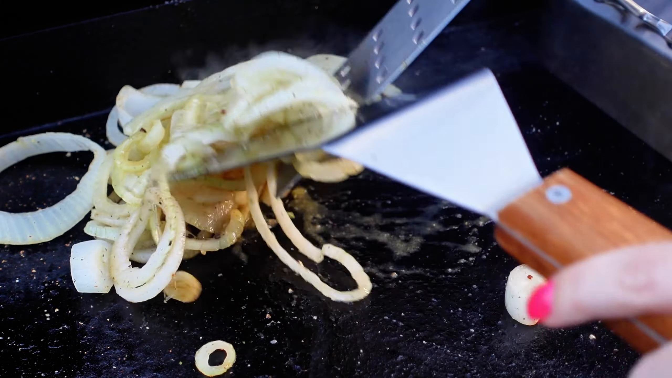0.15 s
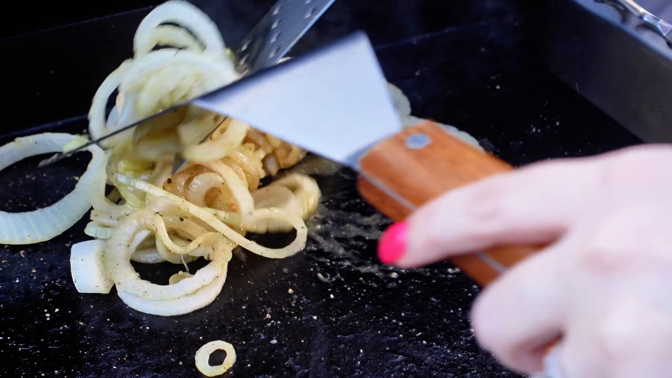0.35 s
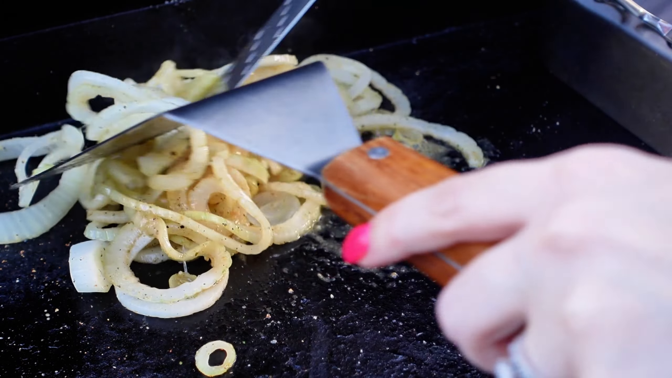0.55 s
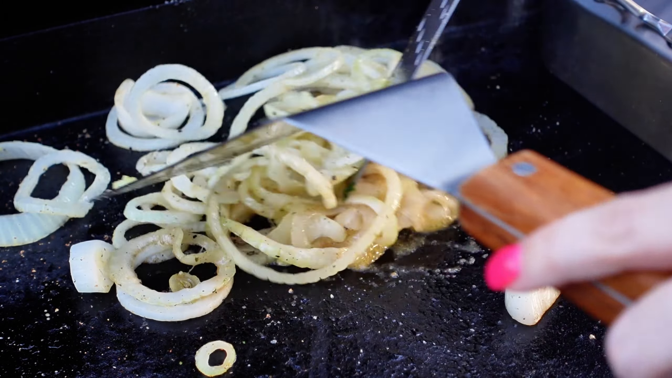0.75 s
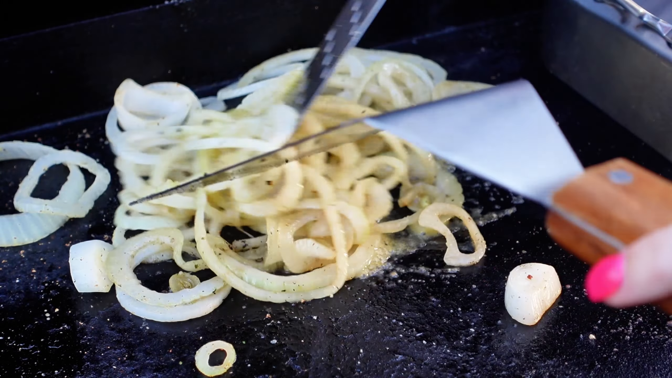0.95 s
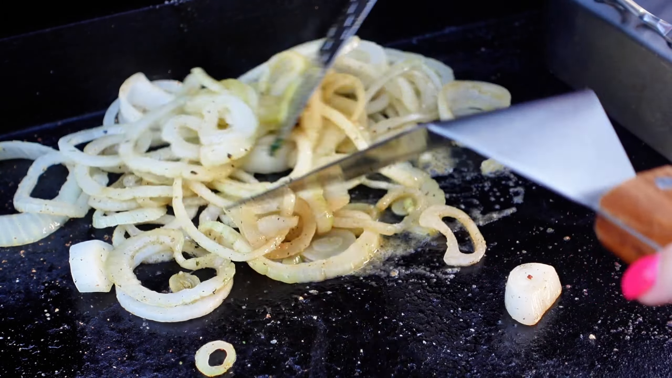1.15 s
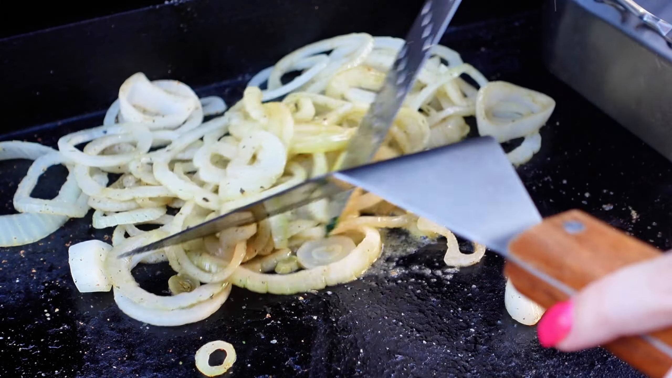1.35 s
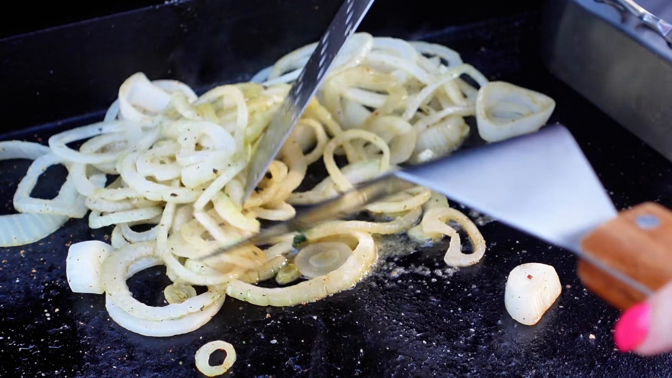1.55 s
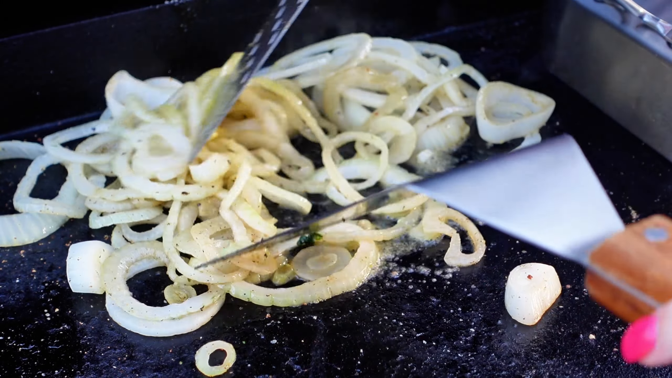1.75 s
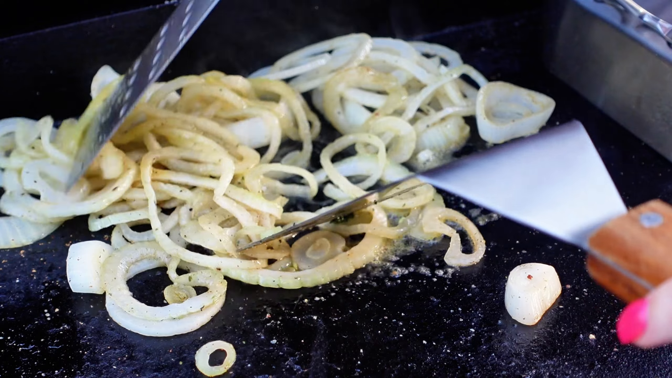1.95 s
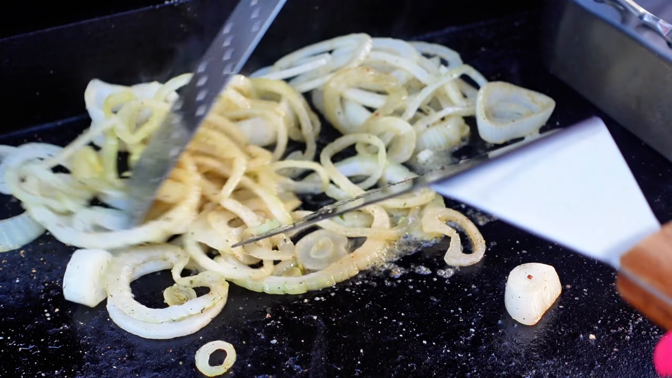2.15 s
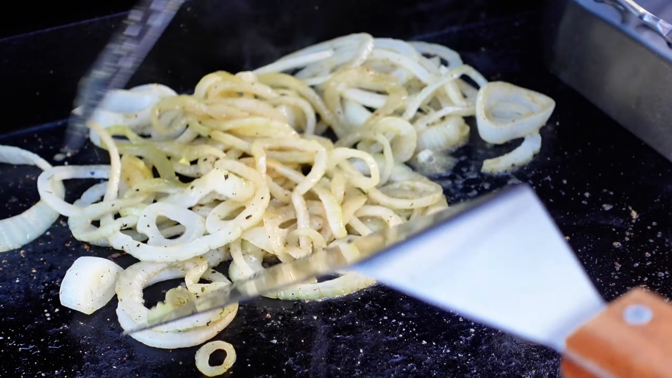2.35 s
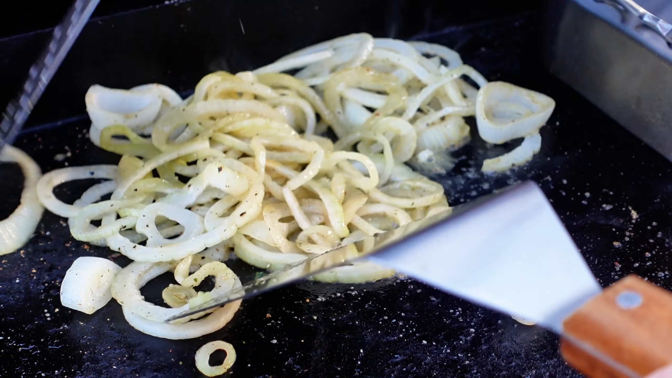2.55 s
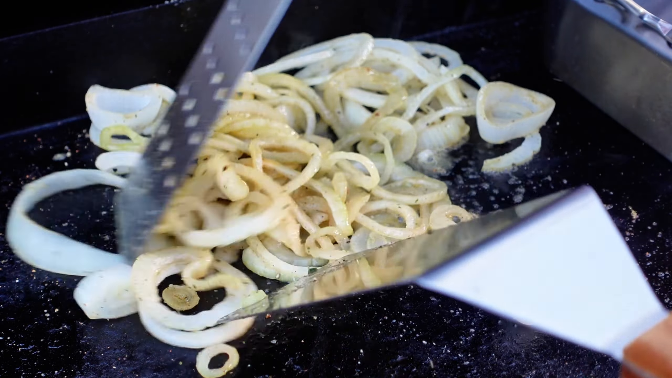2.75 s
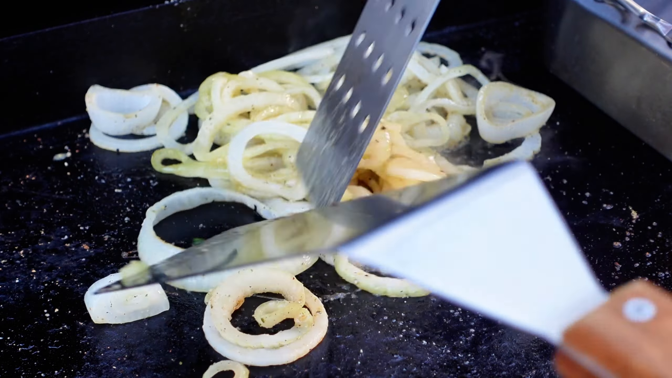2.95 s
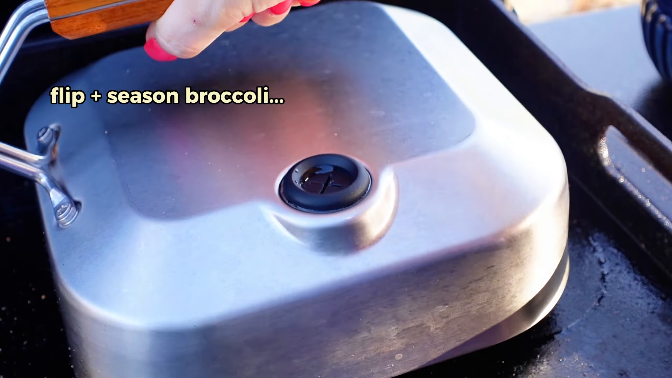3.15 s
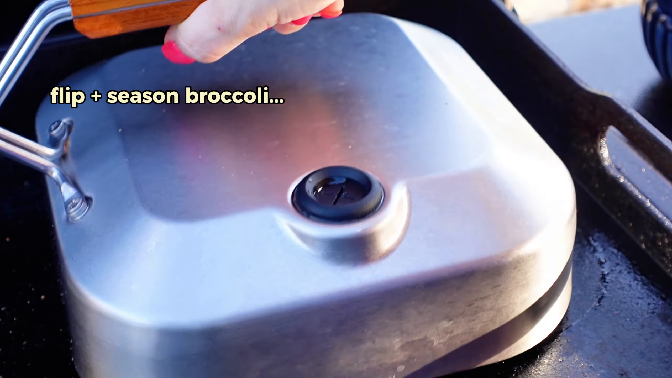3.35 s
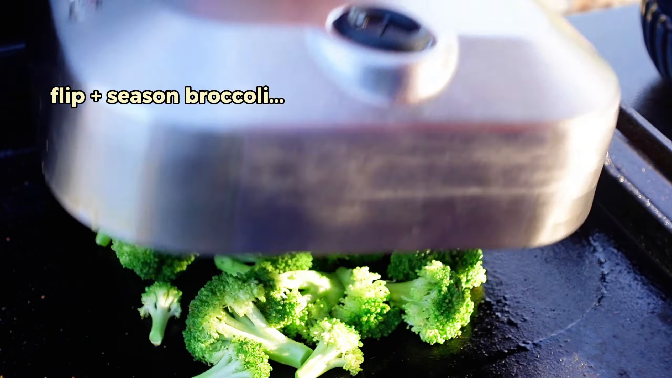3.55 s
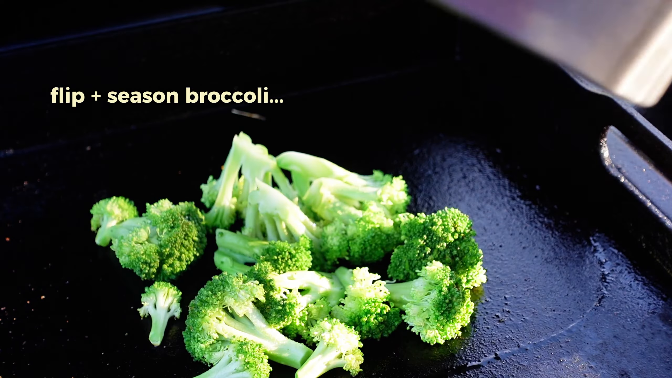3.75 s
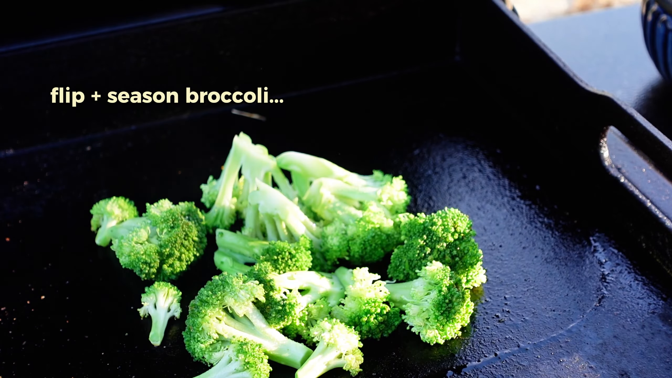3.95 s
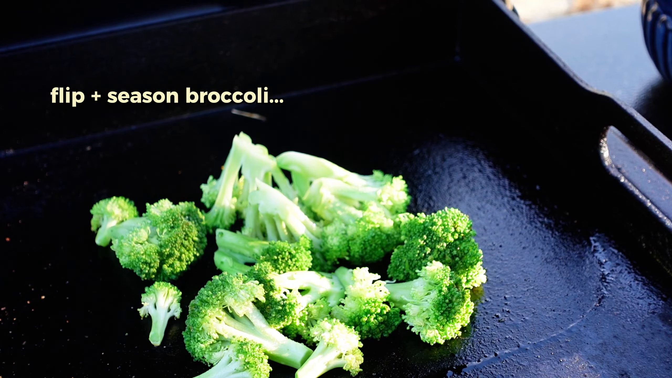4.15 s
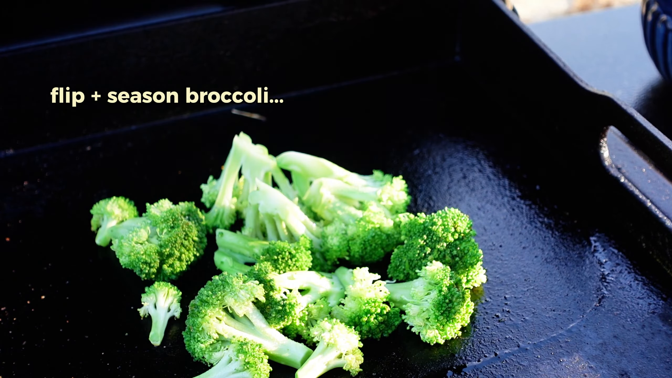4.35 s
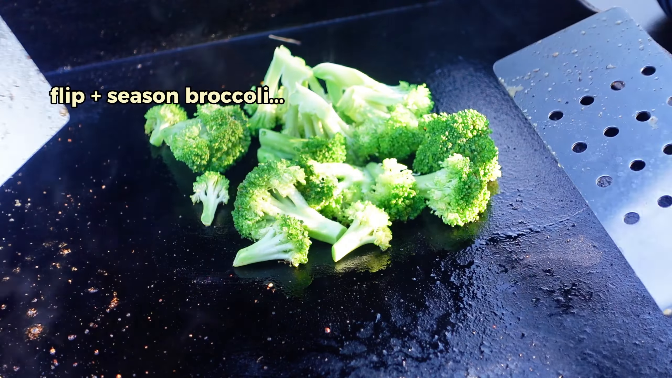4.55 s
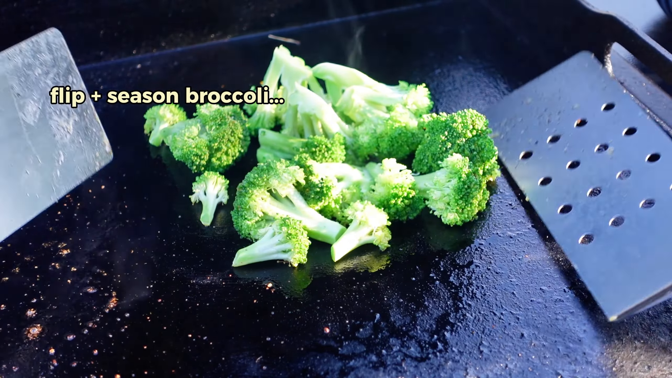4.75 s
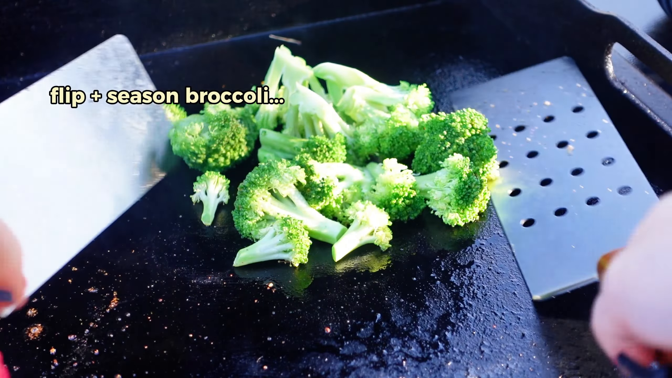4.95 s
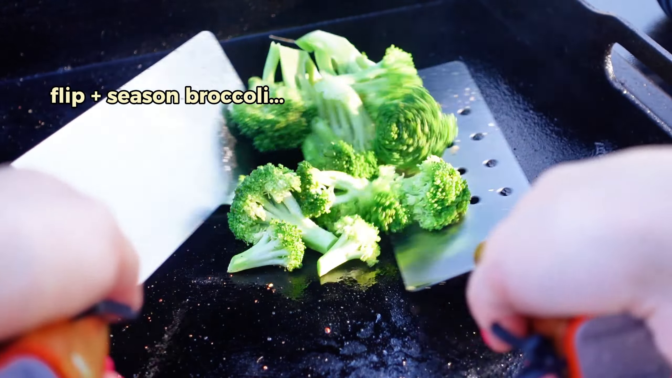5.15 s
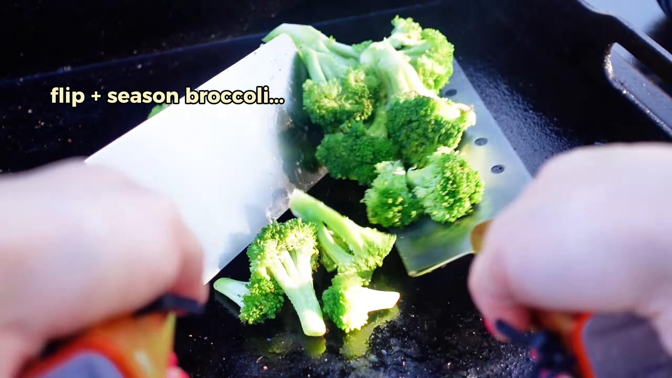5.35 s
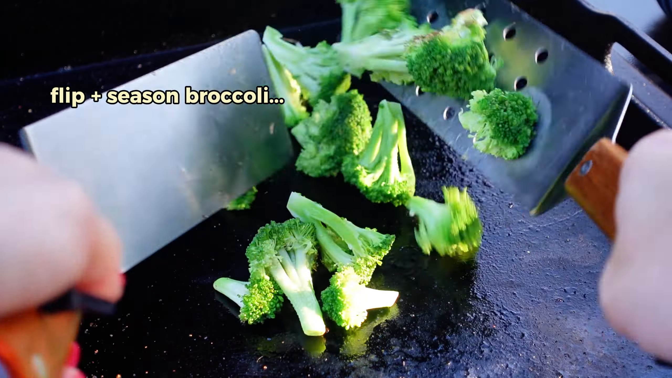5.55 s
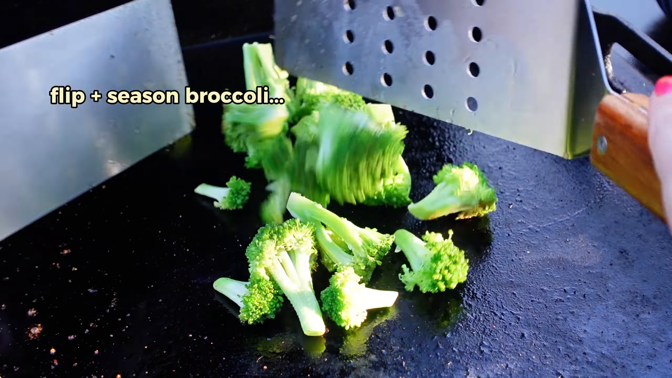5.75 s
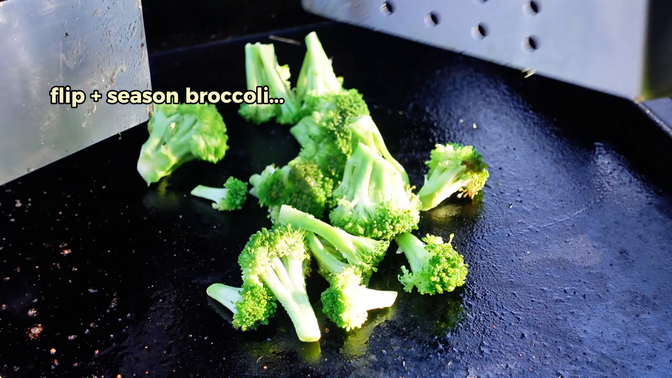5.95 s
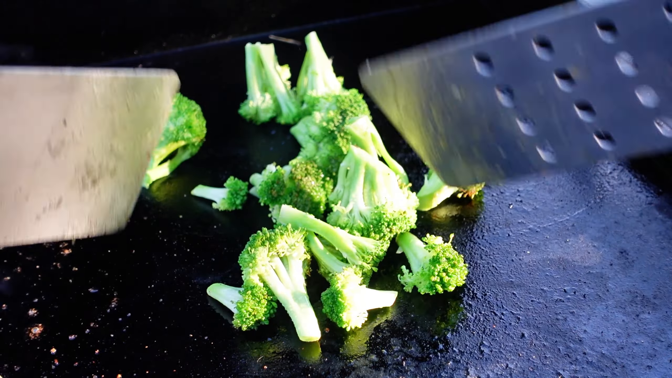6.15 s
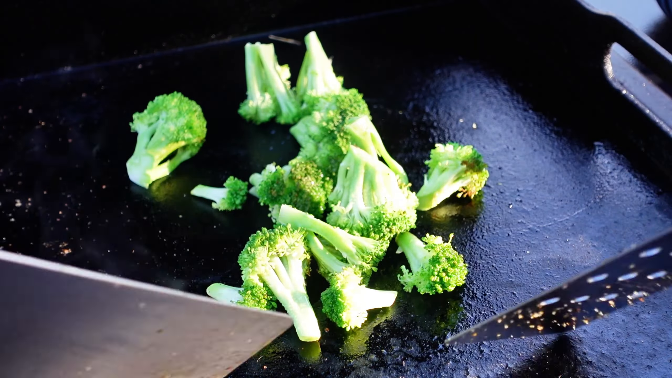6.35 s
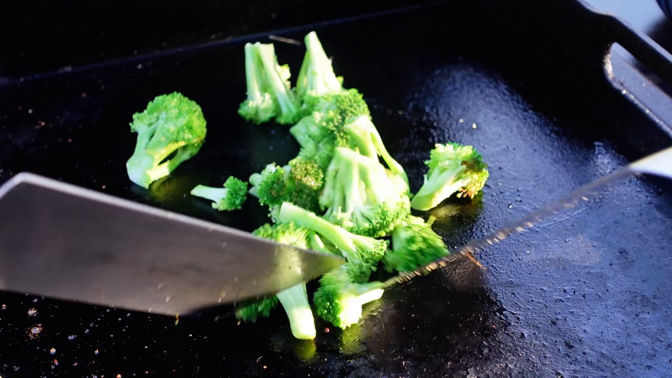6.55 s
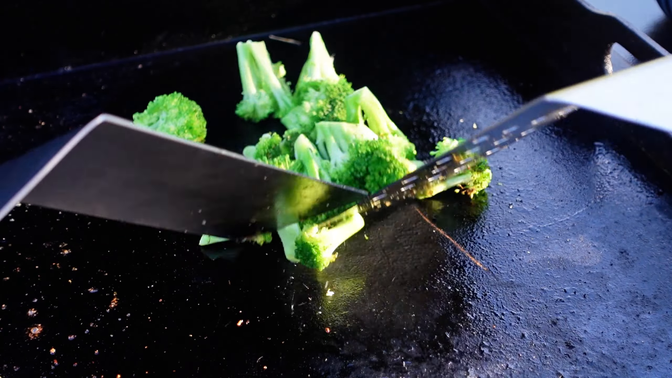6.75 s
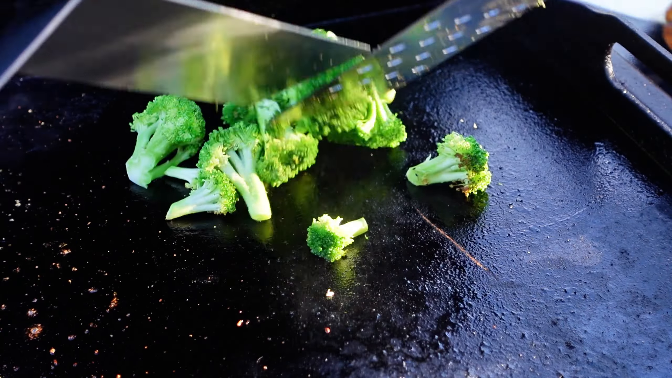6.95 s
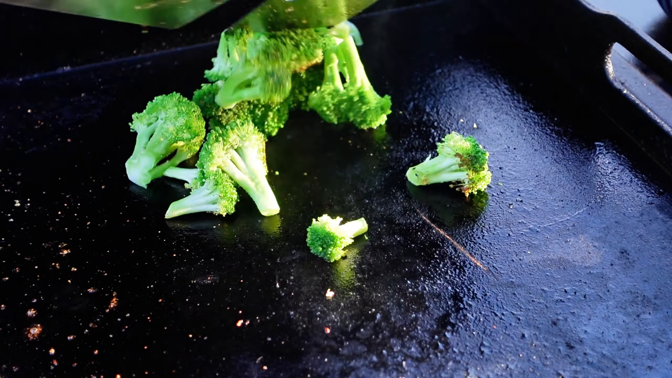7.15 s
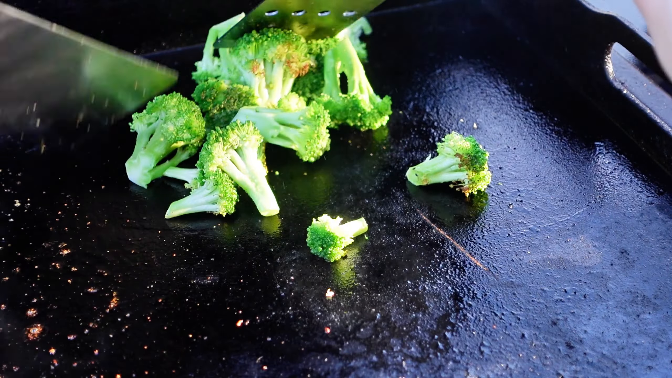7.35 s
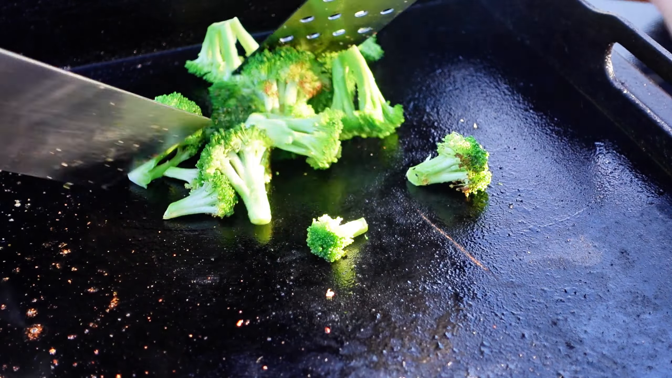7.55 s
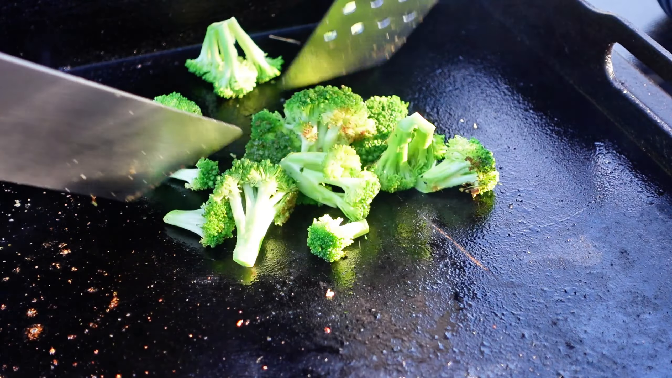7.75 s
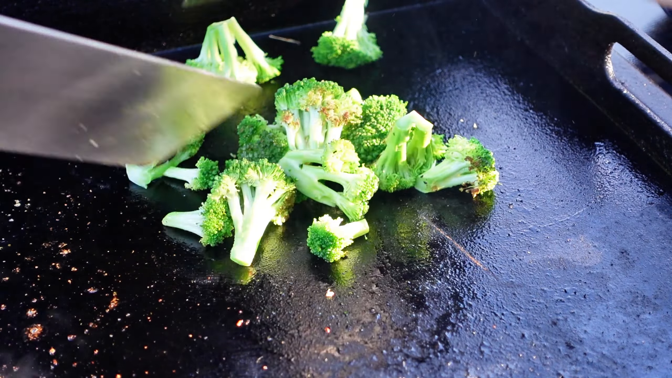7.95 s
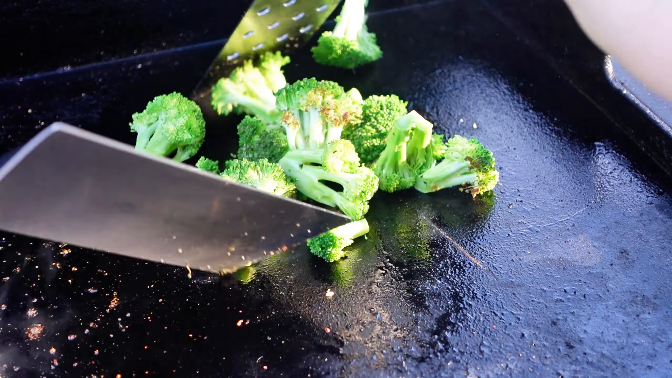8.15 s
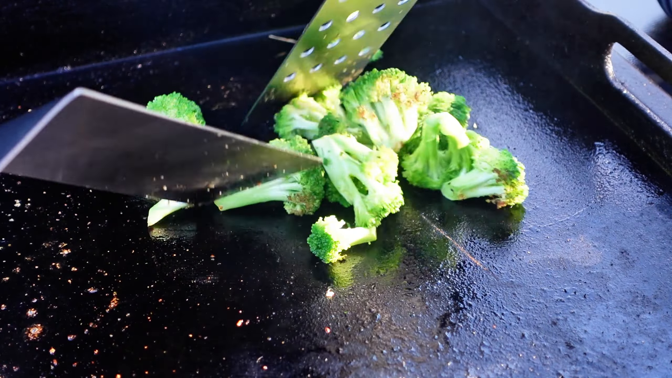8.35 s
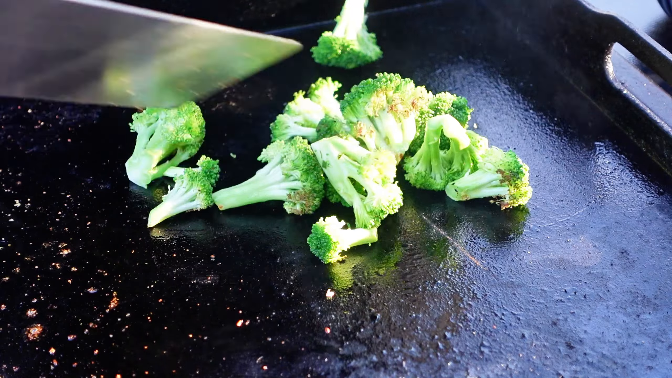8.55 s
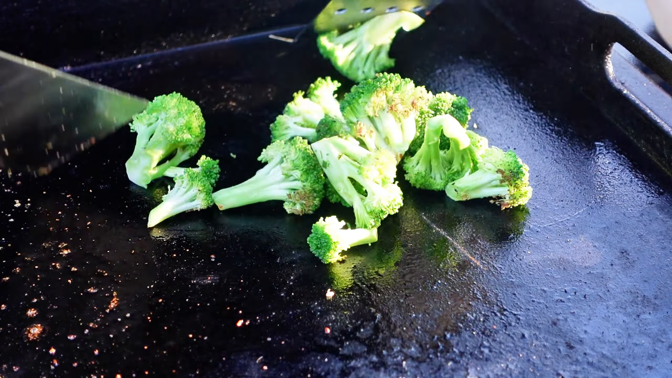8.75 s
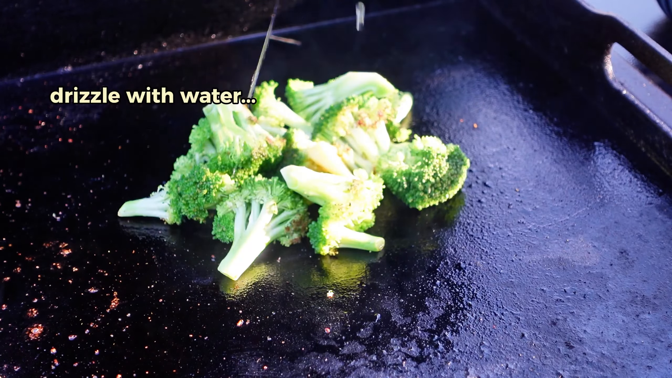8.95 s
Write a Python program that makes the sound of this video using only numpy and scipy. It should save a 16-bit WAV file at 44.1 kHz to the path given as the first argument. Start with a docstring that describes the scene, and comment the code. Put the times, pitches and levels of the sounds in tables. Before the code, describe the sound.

Very close outdoor pickup of frying on a steel griddle, nearly centred, with a faint low gas-flame rumble. From 0 to 3.2 s onions give a dense, bright hiss and fine crackle that surges as they are turned, strongest near 2.1 s. A soft landing opens it; a faint scrape follows at 0.5-0.85, with low muffled thuds. At 1.46-1.6 thin blades clash and ring, with a tiny steam squeak. A sharp clank at 2.6 leads into a scrape. At 3.16 a lid gives a dull, hollow double knock; broccoli then simmers more quietly, with crisp fat snaps. Spatulas clank at 4.8, scrape around 5-5.3 and touch brightly at 5.28. Sizzle flares again; stronger clanks and scrapes come at 6.4-6.75, 7.4-7.7 and 8.1-8.3, with loud pops near 6.5. Last knocks at 8.73-8.8 cut off abruptly, leaving bare, quieter frying until 9.0.

```python
"""Onions, then broccoli, fry on a gas-fired steel griddle outdoors, close to the microphone, in three shots.
Steam bubbles hiss and crackle, fat pops, flames rumble; a spatula lands and scrapes amid soft low thuds.
Near 1.5 s the blades clash and steam squeaks; near 3.2 s, as the broccoli begins, a lid is knocked as it lifts.
More blows and scrapes follow, with a last touch of blades near 5.3 s; the third shot is a moment of frying.
Filtered noise and random impacts make the frying; contact forces ring the modes of plate, blades and lid."""
import sys
import numpy as np
from scipy import signal
from scipy.io import wavfile
from scipy.ndimage import uniform_filter1d

SR = 44100
rng = np.random.default_rng(int(sys.argv[2]) if len(sys.argv) > 2 else 0)


def master(y):
    """Save y as 16-bit WAV."""
    cut = np.clip(np.atleast_2d(y).T, -1, 1)
    pcm = np.round(cut * 32767)  # scale
    wavfile.write(sys.argv[1], SR, pcm.astype(np.int16))


N = 397341

# Where the shots begin, and where the last one ends, in seconds.
SHOTS = [0, 3.155, 8.821, 9.02]
# The crowd of weak modes of plate and lid. Each row: frequency in Hz, level in dB per Hz.
CROWD = [(30, -31), (55, -12), (70, -23), (130, -8.5), (270, 1.5), (430, 0), (560, -10), (850, -11),
         (1100, -5), (1550, -0.5), (2600, 1.5), (5000, 6.5), (16000, -13)]


def amp(db):
    """Decibels to gain."""
    return 10 ** (np.asarray(db) / 20)


def rms(x):
    """Root mean square."""
    return np.sqrt(np.mean(x ** 2) + 1e-20)


def read(points, hz):
    """A spectrum joined by straight lines on a log-frequency axis."""
    f, value = np.transpose(points)
    return np.interp(np.log(hz + 1), np.log(f + 1), value)


def add(mix, s, sound):
    """Mixes a sound in at time s."""
    part = mix[max(round(s * SR), 0):][:len(sound)]
    part += sound[:len(part)]


def seconds(length):
    """A time axis."""
    return np.arange(int(length * SR)) / SR


def colour(x, db_of_hz, size=4096):
    """Causal (minimum-phase) filter whose gain in dB is a function of frequency."""
    hz = abs(np.fft.fftfreq(size, 1 / SR))
    log_gain = np.log(amp(np.maximum(db_of_hz(hz), -100)))
    # the Hilbert transform of the log gain gives the minimum phase
    taps = np.fft.ifft(np.exp(np.conj(signal.hilbert(log_gain)))).real[:size // 2]
    return signal.oaconvolve(x, taps)[:len(x)]


def shaped(x, points):
    """Gives x a spectrum and an rms of 1."""
    y = colour(x, lambda hz: read(points, hz))
    return y / rms(y)


def contacts(count, per_s):
    """Sparse tiny impacts of random size, with an rms near 1."""
    hits = rng.random(count) < per_s / SR
    return rng.standard_normal(count) * hits * np.sqrt(SR / per_s)


def surge(age, rise_s, fade_s):
    """Envelope: a straight rise to 1, then an exponential fade."""
    rise_s = max(rise_s, 1e-3)
    return np.clip(age / rise_s, 0, 1) * np.exp(-np.maximum(age - rise_s, 0) / fade_s)


def sizzle(pivot_hz=6500, flutter_db=0.8, merging=0.14):
    """Separate bubbles over a hiss of merged ones; each turn swells them, the finer ones later and longer."""
    # Colour of the sizzling onions. Each row: frequency in Hz, level in dB per Hz.
    onions = [(100, -46), (500, -13), (800, -8.5), (1000, -5), (1400, -5), (1850, -6), (2700, -1.5),
              (4000, -.5), (6500, 0), (9200, -5), (12500, -11), (16000, -21.5)]
    # Colour of the sizzling broccoli. Each row: frequency in Hz, level in dB per Hz.
    broccoli = [(100, -35), (500, -13), (800, -12), (1000, -12), (1400, -6), (2200, -6), (3400, -1),
                (5000, -2.5), (7000, -3.5), (9700, -7.5), (13000, -12), (16000, -20)]
    # Each row, one a shot: power share of separate bubbles before merging (0-1), spread of their sizes in dB.
    bubbling = [(0.46, 3.5), (0.68, 6), (0.7, 6)]
    # Steady frying of food left alone, one level in dB for each shot.
    simmer_levels = [-31, -34.5, -37]
    out = np.zeros(N)
    core = signal.butter(4, [4500, 9000], "band", fs=SR, output="sos")  # the band that sets the level
    shots = zip(SHOTS, SHOTS[1:], simmer_levels, [onions, broccoli, broccoli], bubbling)
    for start, end, simmer_db, food, (share, spread_db) in shots:
        level_db = boiling_db(start + seconds(end - start), 0, simmer_db, start, end)
        count = len(level_db)
        # where wet food meets fresh hot steel, the bubbles crowd together into hiss
        excess_db = np.maximum(level_db - np.median(level_db), 0)
        share = np.clip(share * amp(-merging * excess_db), 0, 1)
        crackle = np.sqrt(share) * bubbles(count, spread_db)
        hiss = np.sqrt(1 - share) * rng.standard_normal(count)
        steam = shaped(crackle + hiss, food)
        steam /= rms(signal.sosfilt(core, steam))
        hz, t, z = signal.stft(steam, SR, nperseg=256)
        flutter = uniform_filter1d(rng.standard_normal(len(t)), size=4)
        octaves = np.log2(np.clip(hz, 3000, 13000) / pivot_hz)[:, None]
        field_db = boiling_db(start + t, octaves, simmer_db, start, end)
        gain = amp(field_db + flutter_db * flutter / rms(flutter))
        add(out, start, signal.istft(z * gain, SR, nperseg=256)[1][:count])
    return out


def boiling_db(s, octaves, simmer_db, start, end):
    """Sizzle level in one shot, by time and bubble fineness: the simmer plus the surge of every turn."""
    # A turn puts wet food on fresh hot steel and the sizzle surges.
    # Each row: start in seconds, level in dB, rise in seconds, drying time in seconds;
    # level, start and drying time hold for bubbles of middling fineness (0 octaves).
    turns = [(0.0, -33, 0.014, 0.16), (.48, -30.5, 0.18, 0.83), (1.12, -29, 0.19, .25),
             (1.72, -31.5, 0.091, 0.74), (2.1, -25, .075, 0.22), (2.42, -28.5, 0.16, 0.58),
             (2.7, -27, 0.058, 0.58), (5.01, -26.5, 0.076, 0.28), (5.7, -33, 0.11, 0.77),
             (6.58, -25.5, 0.072, 0.59), (6.96, -31.5, 0.03, 0.36), (7.54, -28, 0.048, 0.69),
             (8.18, -28.5, 0.12, 0.31), (8.66, -33.5, 0.11, 0.39)]
    # each octave of finer bubbles comes later, lasts longer and gains more from a turn
    lag_s_per_octave, linger_per_octave, db_per_octave = 0.02, 1.02, 1.8
    power = amp(simmer_db) ** 2 + 0 * (s + octaves)
    for at, db, rise_s, dry_s in turns:
        if start <= max(at, 0) < end:
            age = s - at - lag_s_per_octave * octaves
            swell = surge(age, rise_s, dry_s * linger_per_octave ** octaves)
            power = power + (amp(db + db_per_octave * octaves) * swell) ** 2
    return 10 * np.log10(power)


def bubbles(length, spread_db, per_s=260, largest=3.9, top_hz=12500, count=10):
    """Steam bubbles burst at several spots on the plate: many small, a few large."""
    spots = []
    for _ in range(count):
        bursts = np.sign(contacts(length, per_s))
        size_db = spread_db * np.minimum(rng.exponential(1, length), largest)
        spots.append(walls(bursts * amp(size_db)))
    total = sum(spots)
    return colour(total / rms(total), lambda hz: -10 * np.log10(1 + (hz / top_hz) ** 6))


def walls(x, echo_s=.0014, echo=0.23, scatter=0.68, fade_s=0.0062):
    """The steel walls of the griddle return a burst once, near echo_s, and scatter it for milliseconds."""
    t = seconds(.04)
    taps = rng.standard_normal(len(t)) * np.exp(-t / fade_s)
    taps *= scatter / np.linalg.norm(taps)
    taps[0] = 1
    taps[int(echo_s * rng.uniform(.7, 1.3) * SR)] += echo
    return signal.oaconvolve(x, taps)[:len(x)]


def pops(slope_db=3.5):
    """A drop of water bursts in the fat: a sharp snap and a brief spray."""
    # The loudest spits of fat. Each row: time in seconds, peak in dB, centre in Hz.
    loud = [(0.166, -10, 6810), (1.1466, -9, 5500), (3.0794, -7.5, 5120), (3.269, -9, 5000),
            (3.396, -11, 6600), (3.521, -9.5, 4340), (3.899, -8.5, 7130), (4.2055, -13.5, 4160),
            (4.4735, -9, 4300), (4.504, -13, 4890), (4.726, -12, 4800), (5.0439, -6, 4200),
            (5.345, -6.5, 4100), (5.367, -9, 8190), (5.4698, -8, 3960), (5.4987, -12, 3400),
            (5.5475, -9.5, 4100), (5.673, -10.5, 3880), (5.7514, -13.5, 5240), (6.3478, -12.5, 3480),
            (6.4919, -6, 3570), (6.6212, -4.5, 3120), (7.2472, -12, 3380), (7.3766, -8, 4180),
            (7.5561, -8.5, 6300), (7.9463, -13, 5300), (8.0032, -10, 3700), (8.7081, -9.5, 2690),
            (8.9521, -11, 8500)]
    # the broccoli also throws smaller spits at random
    spits_per_s, spit_db, spit_spread_db, spit_hz = 2.0, -19.5, 5, 4200
    spray, spray_s = .26, .0017  # size relative to the snap, fade time
    out, t = np.zeros(N), seconds(.05)
    chances = np.arange(SHOTS[1], SHOTS[2], .01)
    draw = rng.random(len(chances))
    size, pitch = rng.standard_normal((2, len(chances)))
    small = np.transpose([chances, spit_db + spit_spread_db * size, spit_hz * 2 ** (.3 * pitch)])
    small = small[draw < spits_per_s * np.diff(chances)[0]]
    for s, db, centre_hz in [*loud, *small]:
        burst = (t == 0) + spray * rng.standard_normal(len(t)) * np.exp(-t / spray_s)

        def hump_db(hz):
            octaves = np.log2((hz + 1) / centre_hz)
            return -slope_db * np.minimum(octaves ** 2, 7) - (hz / 9000) ** 4

        snap = colour(walls(burst, scatter=0.44, fade_s=0.0025), hump_db)
        add(out, s + 0.00093, amp(db) * snap / abs(snap).max())  # every pop sounds 0.93 ms after its time
    return out


def griddle(crowd_db=-0.5, rub_crowd_db=2.5, grit_per_s=800):
    """Blows and scrapes of the spatulas ring the same steel plate."""
    # A spatula lands. Each row: time in seconds, level in dB, flatness from 0 (edge first) to 1 (whole
    # blade), hardness in Hz, mode favoured by the spot in Hz.
    blows = [(0.0, -28, 0.75, 1400, 347), (2.6106, -19, .1, 4650, 2290), (2.628, -21.5, 0.7, 3580, 688),
             (4.8, -24.5, 0.11, 2200, 1670), (4.828, -24, 1, 2400, 2290), (5.28, -29.5, 0.4, 3000, 2145),
             (5.293, -23, 0.98, 2110, 755), (6.366, -20, 0.53, 2100, 1339), (6.383, -17.5, 0.71, 2070, 999),
             (7.416, -18.8, .2, 4200, 1119), (7.44, -20, 0.79, 3400, 1386), (7.585, -26, 0.13, 2620, 1386),
             (8.079, -20, 0.12, 2760, 2067), (8.094, -21, .25, 2680, 1670), (8.138, -21.5, 0.64, 1800, 451),
             (8.73, -21.5, .22, 2150, 1320), (8.811, -23.5, 0.016, 1990, 1386)]
    # A blade is pushed along the plate. Each row: start in seconds, end in seconds, level in dB,
    # hardness in Hz, mode favoured by the spot in Hz.
    scrapes = [(0.496, 0.855, -39, 3080, 451), (2.66, 2.82, -26.5, 3380, 451),
               (4.94, 5.094, -29.5, 1690, 269), (5.096, 5.282, -33.5, 1590, 999),
               (6.454, 6.598, -29, 1800, 347), (6.571, 6.76, -31, 1800, 1446),
               (7.565, 7.725, -36.5, 1970, 2145), (8.168, 8.33, -28, 2070, 1386)]
    # Strong modes of the plate. Each row: frequency in Hz, relative level in dB, t60 in seconds.
    plate_modes = [(202.5, -4.5, 0.4), (242, -9.5, 0.86), (275.8, 2, 0.56), (347, -3, 0.48), (392, 1, 0.17),
                   (451, 1.5, 0.43), (588, -3.5, 0.54), (688, 1.5, 0.22), (755, -6.5, 0.46),
                   (827, -10.5, 0.49), (940, -5.5, 0.45), (999, 0.5, 0.26), (1119, -3, 0.85),
                   (1265, -9, 0.31), (1339, -2, 0.53), (1386, 2.5, 0.28), (1446, 4.5, 0.16),
                   (1547, -2, 0.45), (1670, 10, 0.078), (1695, -1, 0.42), (1894, -1, 0.49),
                   (1980, -4, 0.63), (2067, -1, 0.42), (2145, 1.5, 0.15), (2290, 6, 0.12),
                   (2555, 2.5, 0.32), (2665, 0.5, 0.15), (2700, -4, 0.65), (3320, -0.5, 0.49),
                   (3520, 7, 0.33)]
    out = np.zeros(N)
    for s, db, flat, hard_hz, spot_hz in blows:
        # a flatter landing chatters longer, drives more bass and favours one mode less
        chatter_s = np.exp(np.interp(flat, [0, 1], np.log((0.0082, 0.066))))
        bass_db = np.interp(flat, [0, 1], (-14, 3))
        lift_db = np.interp(flat, [0, 1], (10.5, 9))
        force = chatter(chatter_s, first=0.8, per_s=900)
        clank = struck(force, plate_modes, spot_hz, lift_db, CROWD, crowd_db)
        add(out, s, at_level(contact_colour(clank, hard_hz, bass_db), db))
    for start, end, db, hard_hz, spot_hz in scrapes:
        count = int((end - start) * SR)
        grit = contacts(count, grit_per_s) * signal.windows.tukey(count, .4)
        force = np.pad(grit, (0, SR // 2))  # room for the plate to ring on
        lift_db = 7.5 * spot_hz / 1000  # high modes squeal most
        bass_db = -1 - 8.5 * np.log2(hard_hz / 1800)  # a harder scrape drives less bass
        rub = struck(force, plate_modes, spot_hz, lift_db, CROWD, rub_crowd_db)
        add(out, start, at_level(contact_colour(rub, hard_hz, bass_db), db, size=count))
    # the ringing ends with its shot
    return out * np.clip((SHOTS[2] - np.arange(N) / SR) / 0.0061, 0, 1)


def blades(crowd_db=0.0):
    """The two thin blades strike and slide over each other."""
    # Blade against blade. Each row: time in seconds, level in dB, chatter time in seconds,
    # mode favoured by the spot in Hz, its lift in dB.
    clashes = [(1.4625, -20, 0.029, 6944, 12), (1.513, -26, 0.033, 1383, 0), (1.521, -23, 0.0094, 2772, 28),
               (1.544, -26, 0.0053, 8260, 20), (1.605, -30.5, 0.023, 3950, 16),
               (5.2795, -20.5, 0.0051, 11050, 20)]
    # Strong modes of the blades. Each row: frequency in Hz, relative level in dB, t60 in seconds.
    blade_modes = [(936, -6, 0.42), (1383, 1, 0.54), (1470, 0, 0.21), (1674, -1, 0.28), (2120, -2, 0.25),
                   (2450, 1, 0.16), (2772, 0, 0.39), (3423, -15, .22), (3780, 2, 0.18), (3950, -0.5, .15),
                   (4500, -1, 0.12), (4890, -3, 0.31), (6513, -18, .3), (6944, -11, 0.25), (7380, 5, 0.17),
                   (8260, -13, 0.11), (5500, -8, .12), (11050, -15, 0.13)]
    # Weak modes of the blades. Each row: frequency in Hz, level in dB per Hz.
    blade_crowd = [(300, -40), (800, -12), (1300, -1.5), (2400, 0.5), (4300, 5.5), (6000, -1.5), (8000, 3),
                   (10500, -7), (16000, -19)]
    out = np.zeros(N)
    for s, db, length, spot_hz, lift_db in clashes:
        force = chatter(length, per_s=3000)
        clash = struck(force, blade_modes, spot_hz, lift_db, blade_crowd, crowd_db)
        add(out, s, at_level(clash, db))
    return out


def lid(crowd_db=-0.5):
    """The domed lid, knocked as it lifts, gives a dull, hollow double knock."""
    # Each row: time in seconds, level in dB, chatter time in seconds, hardness in Hz,
    # mode favoured by the spot in Hz, its lift in dB.
    knocks = [(3.157, -23, 0.0018, 1390, 1028, 2), (3.182, -20, 0.0083, 1010, 500, 13.5)]
    # Strong modes of the lid. Each row: frequency in Hz, relative level in dB, t60 in seconds.
    lid_modes = [(208.5, -12, 0.49), (255, -13, 0.65), (309, 0.5, 0.51), (458, -16, 0.59),
                 (500, -6.5, 0.073), (710, -15, 0.44), (829, -20, 0.41), (985, -9, 0.54), (1028, -6, 0.37),
                 (1077, -5, 0.37), (1228, -14, .12), (1380, -14, 0.45)]
    out = np.zeros(N)
    for s, db, length, hard_hz, spot_hz, lift_db in knocks:
        knock = struck(chatter(length, first=1.23), lid_modes, spot_hz, lift_db, CROWD, crowd_db)
        add(out, s, at_level(contact_colour(knock, hard_hz, 0, steep=4.2, radiate_hz=200), db))
    return out


def chatter(length, first=0.36, per_s=1500):
    """Force of a landing: one impact, then a dying rattle of the springy blade or lid."""
    t = seconds(.7)
    force = contacts(len(t), per_s) * np.exp(-t / max(length, 1e-3))
    force /= np.linalg.norm(force) + 1e-9
    force[0] += first
    return force


def struck(force, modes, spot_hz, lift_db, weak_modes, weak_db):
    """A steel object answers a force with its strong modes and its crowd of weak ones."""
    rest = signal.fftconvolve(force, crowd(weak_modes))[:len(force)]
    return ring(force, modes, spot_hz, lift_db) + amp(weak_db) * rest / rms(rest)


def ring(force, modes, spot_hz, lift_db, vary_db=2.0):
    """The modes share the energy of a force; the one with an antinode at the spot takes more."""
    out = np.zeros(len(force))
    for hz, db, t60 in modes:
        # a two-pole resonator
        r, turn = np.exp(-np.log(1000) / (t60 * SR)), 2 * np.pi * hz / SR
        y = signal.lfilter([0, 1], [1, -2 * r * np.cos(turn), r * r], force)
        spot_db = lift_db * np.exp(-((hz - spot_hz) / 30) ** 2)
        db = db + spot_db + vary_db * rng.standard_normal()
        out += amp(db) * np.sqrt(t60) * y / rms(y) * rng.choice([-1, 1])
    return out / rms(out)


def crowd(points):
    """Impulse response of countless weak modes, the high ones dying first; unit energy."""
    # Each row: frequency in Hz, t60 in seconds.
    decay = [(100, 0.57), (400, 0.44), (1500, 0.1), (5000, 0.058)]
    hz, t, z = signal.stft(rng.standard_normal(SR), SR, nperseg=256)
    fade = amp(-60 * t / read(decay, hz)[:, None])
    y = shaped(signal.istft(z * fade, SR, nperseg=256)[1][:SR], points)
    return y / np.linalg.norm(y)


def contact_colour(x, hard_hz, bass_db, steep=2.46, bass_hz=430, radiate_hz=95):
    """A soft contact leaves out the treble; a flat, heavy one drives the low modes."""
    # sheet steel radiates little deep bass
    x = signal.sosfilt(signal.butter(2, radiate_hz, "high", fs=SR, output="sos"), x)

    def contact_db(hz):
        bass = bass_db / (1 + (hz / bass_hz) ** 4)
        return bass - 10 * np.log10(1 + (hz / hard_hz) ** (2 * steep))

    return colour(x, contact_db)


def at_level(x, db, size=2000):
    """Sets the rms level of the first size samples."""
    return amp(db) * x / rms(x[:size])


def soft_thuds(per_s=250):
    """Soft low thuds and rubbing on the plate: dense small impacts that swell and die away."""
    # Each row: start in seconds, level in dB.
    swells = [(.04, -44), (.6, -43.5), (.98, -39.5), (1.65, -44.5), (2.84, -44)]
    # Colour of the thuds. Each row: frequency in Hz, level in dB per Hz.
    thud = [(60, -22), (130, -12.5), (200, -2.5), (290, -4), (400, -12), (550, -16), (1000, -31.5)]
    rise_s, settle_s = 0.022, 0.38
    t = np.arange(N) / SR
    power = sum((amp(db) * surge(t - s, rise_s, settle_s)) ** 2 for s, db in swells)
    return np.sqrt(power) * shaped(contacts(N, per_s), thud)


def squeak():
    """Steam trapped under the food escapes with a short, fuzzy whistle: narrow-band noise."""
    # One row: start in seconds, length in seconds, level in dB before the fades, pitch in Hz, width in Hz.
    whistle = (1.5, .08, -33, 3380, 70)
    s, length, db, pitch_hz, width_hz = whistle
    noise = rng.standard_normal(len(seconds(length)))
    tone = colour(noise, lambda hz: -20 * np.log10(1 + ((hz - pitch_hz) / width_hz) ** 2))
    out = np.zeros(N)
    add(out, s, amp(db) * signal.windows.hann(len(tone)) * tone / rms(tone))
    return out


def burner(level_db=-47.5):
    """Gas flames under the plate: steady coloured noise."""
    # Each row: frequency in Hz, level in dB per Hz.
    flame_colour = [(20, -16), (42, -23), (62, -10.5), (85, -15), (122, 0.5), (155, -5), (220, -3.5),
                    (290, -6), (400, -4.5), (560, -25.5), (1000, -12), (2500, -43.5)]
    return amp(level_db) * shaped(rng.standard_normal(N), flame_colour)


def widen(mid, width, fade_s=0.0079):
    """Stereo width: a scattered, coloured copy is added on the left and subtracted on the right."""
    t = seconds(.05)
    scatter = rng.standard_normal(len(t)) * np.exp(-t / fade_s)
    scattered = signal.oaconvolve(mid, scatter / np.linalg.norm(scatter))[:N]
    side = colour(scattered, lambda hz: read(width, hz))
    return np.array([mid + side, mid - side])


def scene():
    """Frying and flames almost straight ahead, the metal a little to the right."""
    # Stereo width of the metal. Each row: frequency in Hz, side minus mid in dB.
    metal_width = [(60, -73), (260, -25), (420, -30), (680, -12), (1100, -24.5), (1900, -22.5), (4000, -21),
                   (14000, -19)]
    # Stereo width of the frying, nearly mono in the middle bands.
    # Each row: frequency in Hz, side minus mid in dB.
    frying_width = [(60, -28), (280, -17), (600, -10.5), (1100, -13), (2000, -69), (6000, -25), (9000, -68),
                    (13000, -9), (16000, -16)]
    frying = widen(sizzle() + pops() + soft_thuds() + squeak() + burner(), frying_width)
    metal = widen(griddle() + blades() + lid(), metal_width)
    return frying * amp([[-.1], [.1]]) + metal * amp([[-.3], [.3]])  # left, right


def record(dry):
    """The recorder cuts the bass below 55 Hz and the treble above 16 kHz."""
    cut = signal.sosfilt(signal.butter(4, 55, "high", fs=SR, output="sos"), dry)
    band_limit = signal.firwin(601, 16050, window=("kaiser", 9), fs=SR)
    return signal.oaconvolve(cut, band_limit[None], "same")


dry = scene()
out = record(dry)
master(out)
```